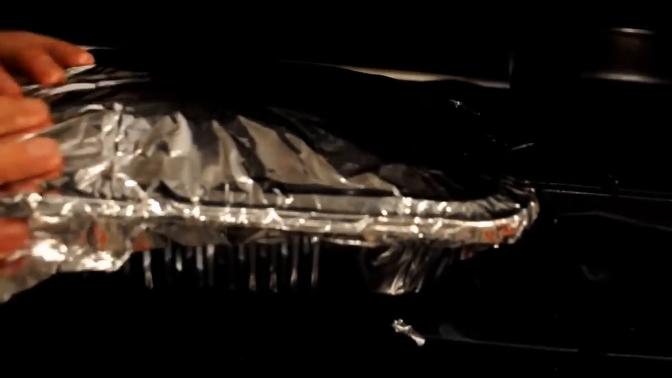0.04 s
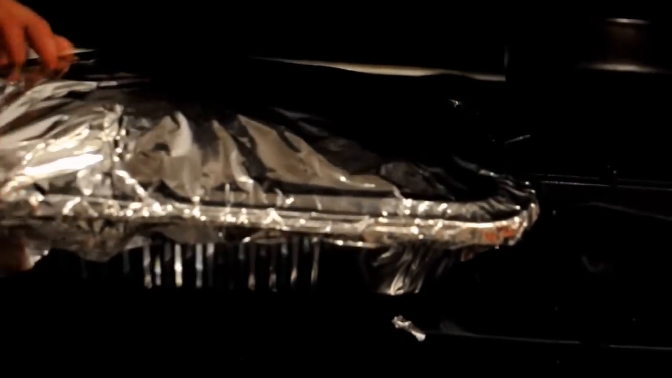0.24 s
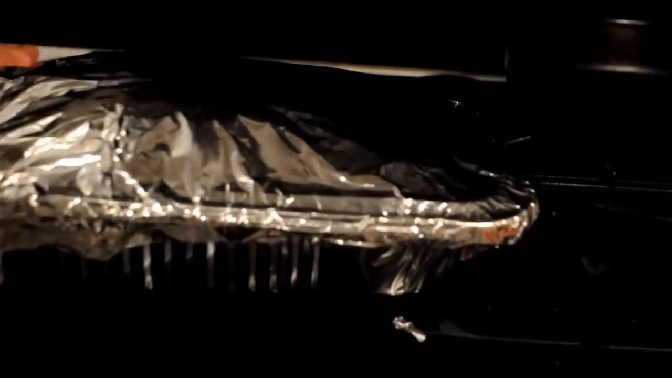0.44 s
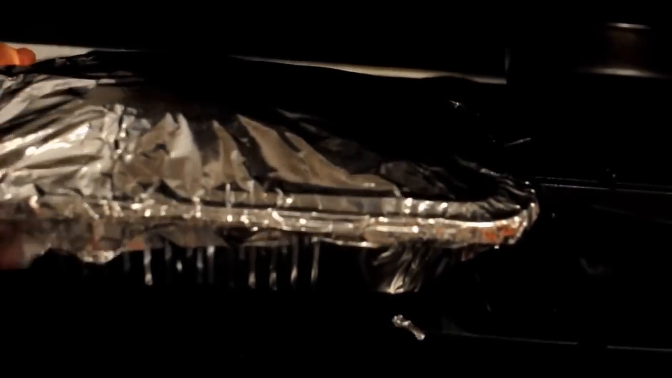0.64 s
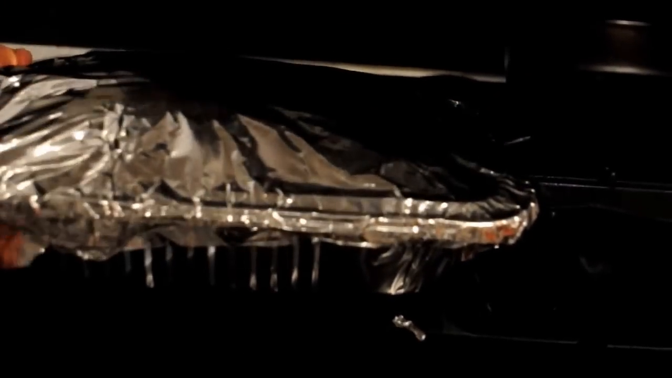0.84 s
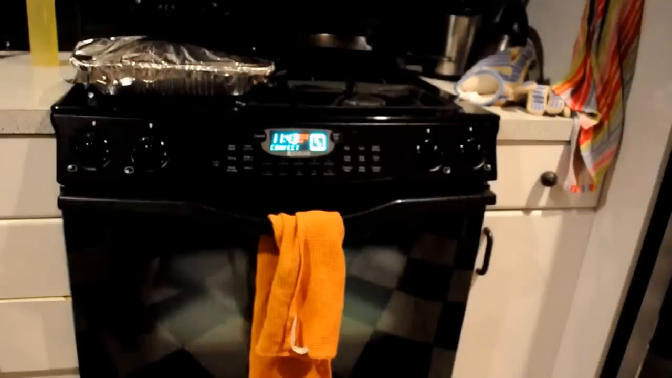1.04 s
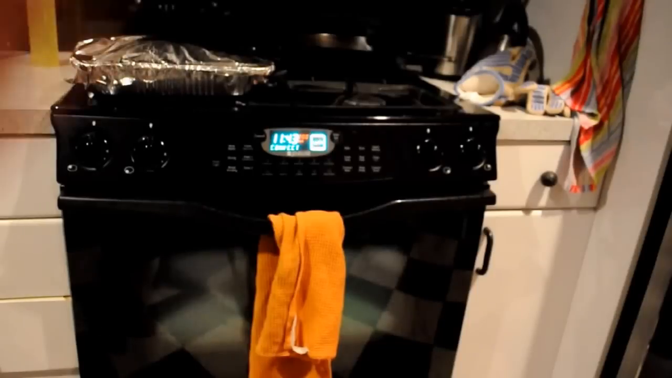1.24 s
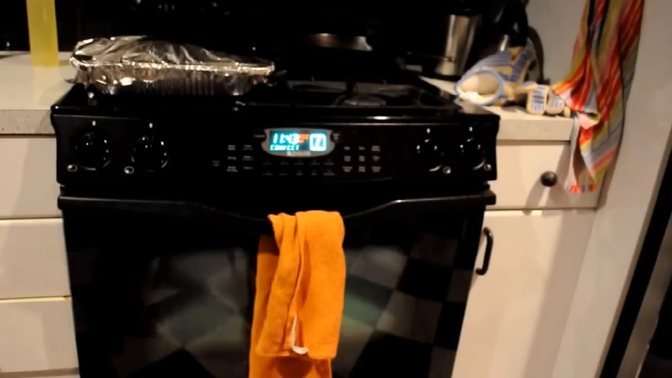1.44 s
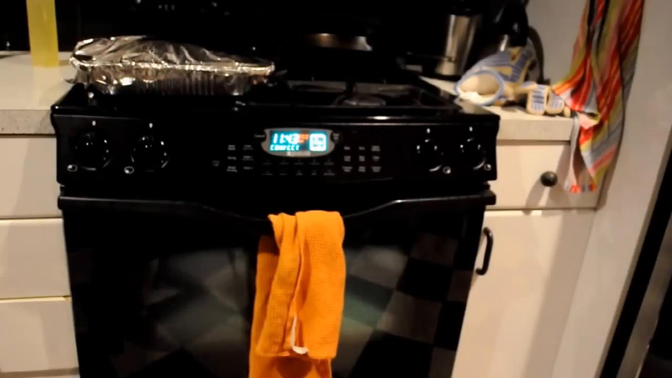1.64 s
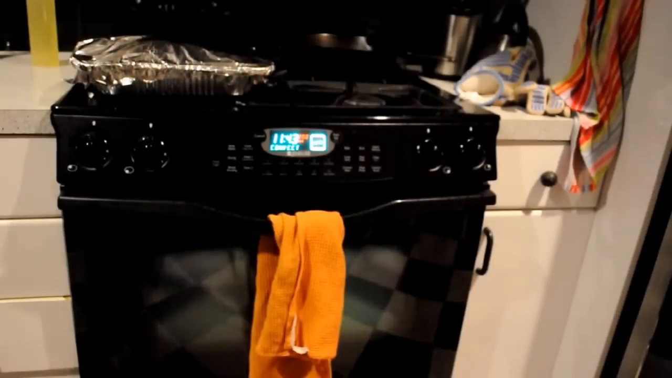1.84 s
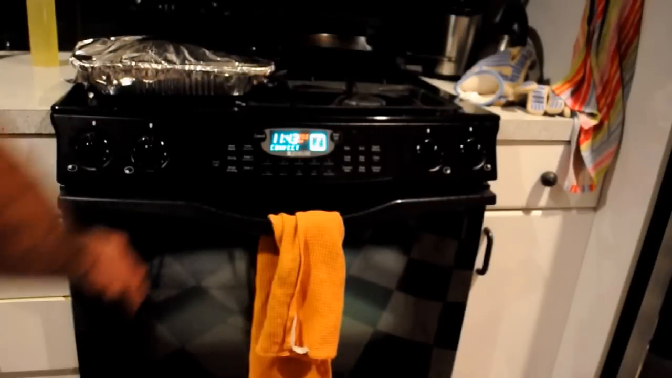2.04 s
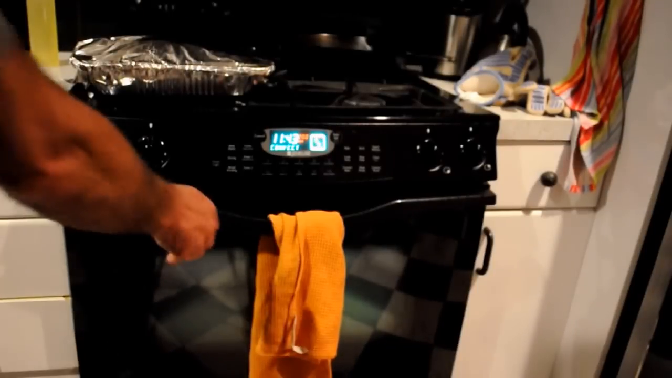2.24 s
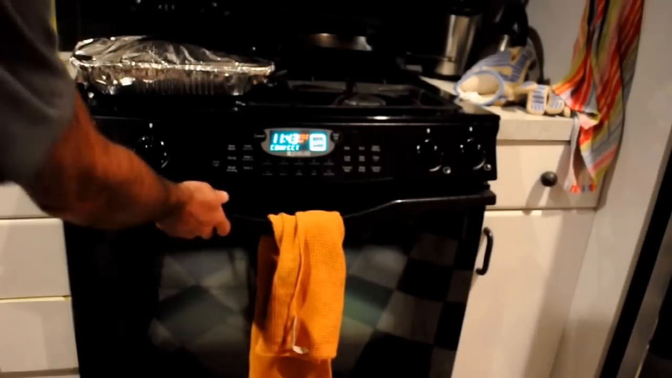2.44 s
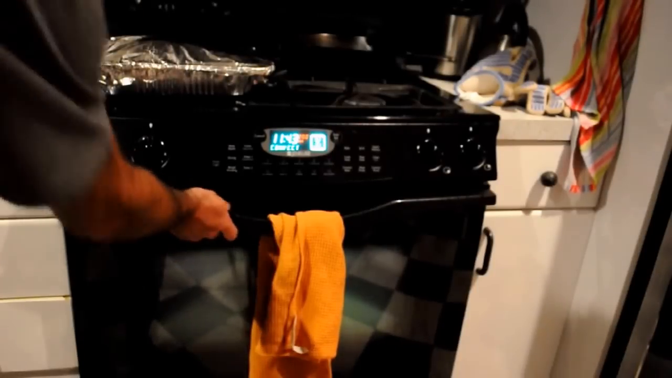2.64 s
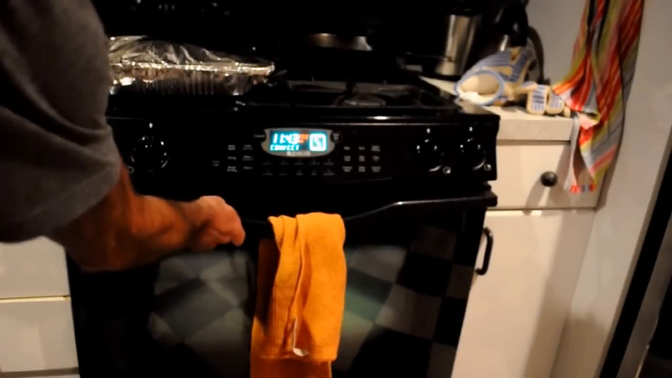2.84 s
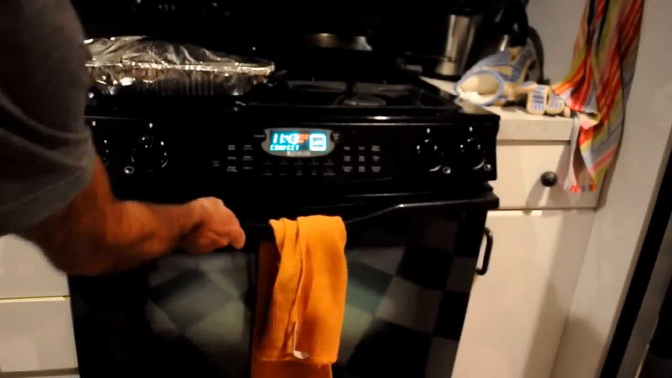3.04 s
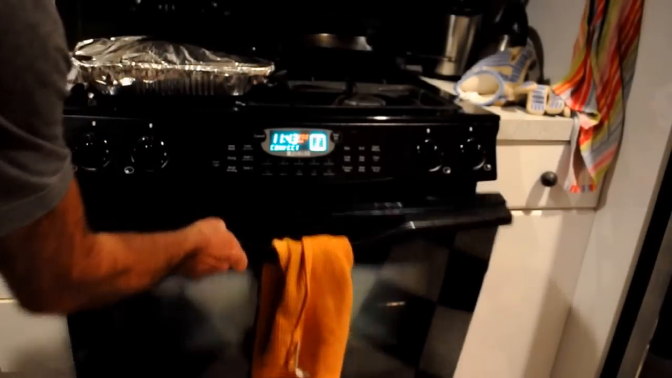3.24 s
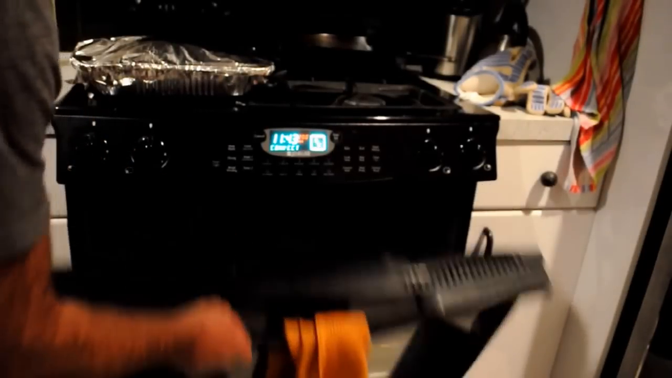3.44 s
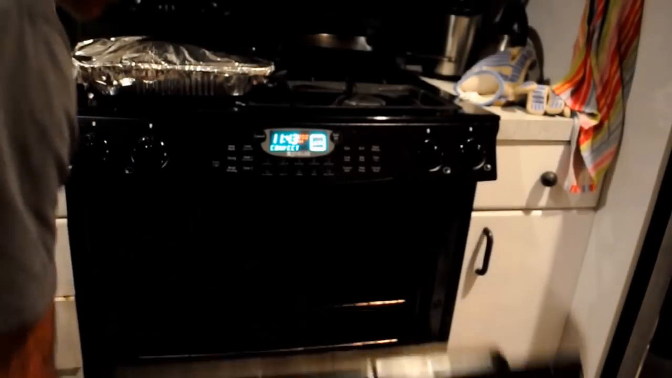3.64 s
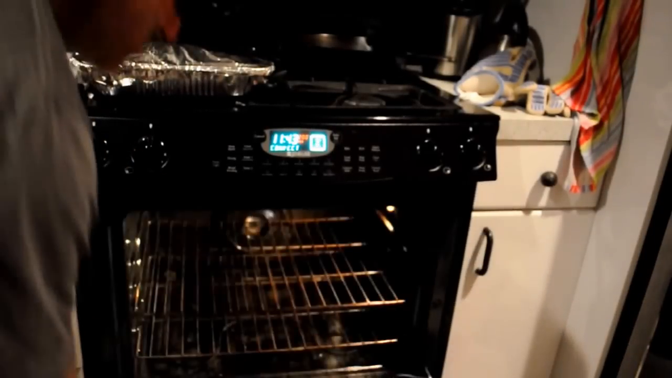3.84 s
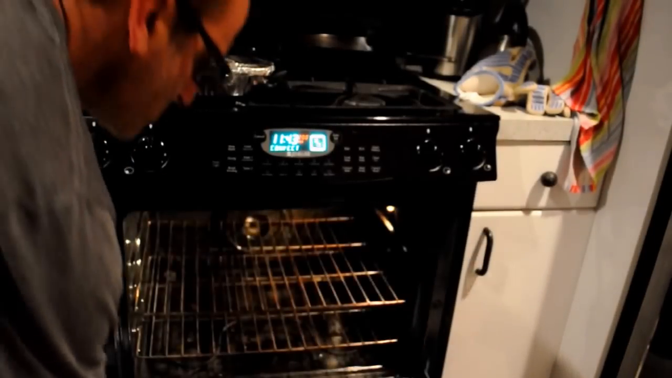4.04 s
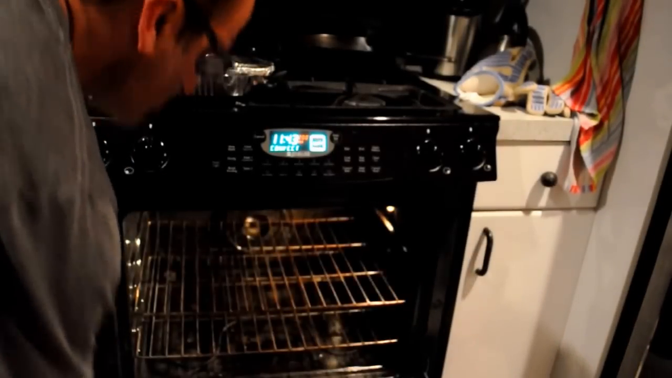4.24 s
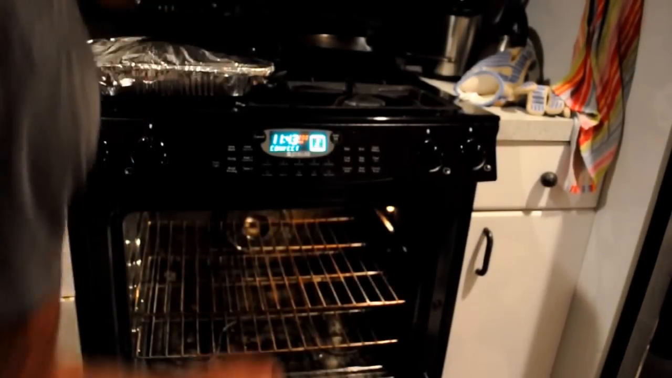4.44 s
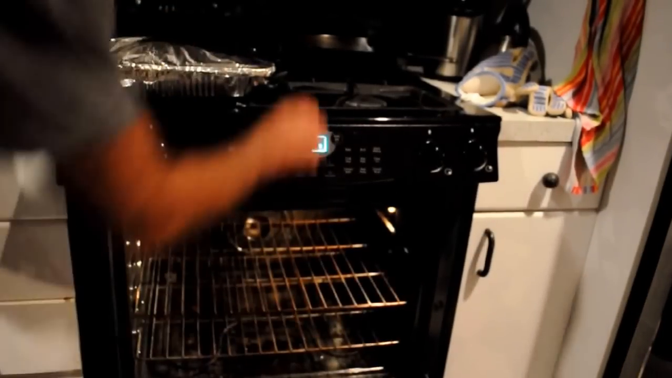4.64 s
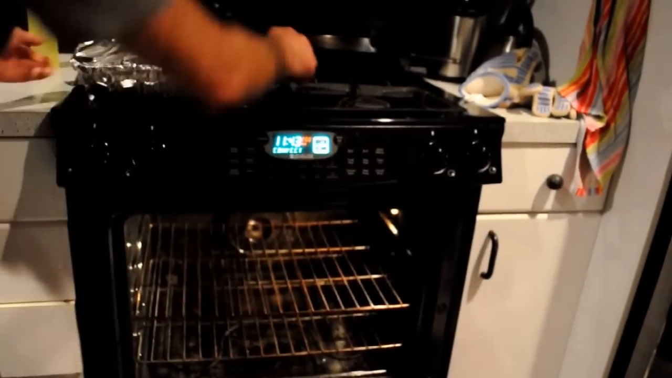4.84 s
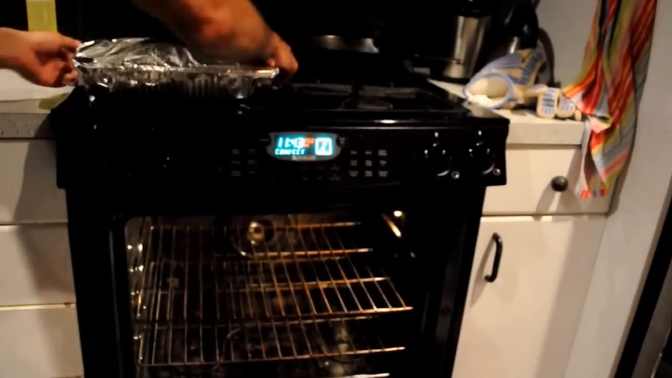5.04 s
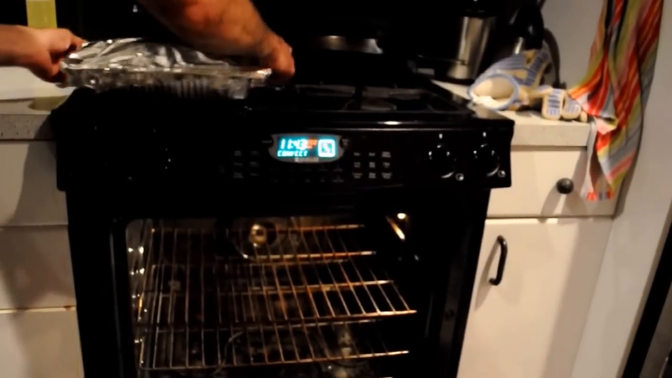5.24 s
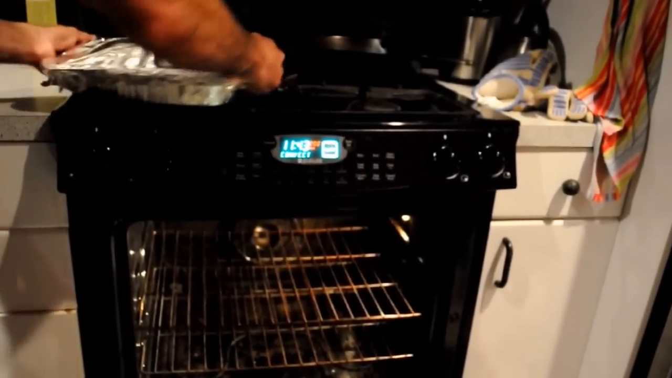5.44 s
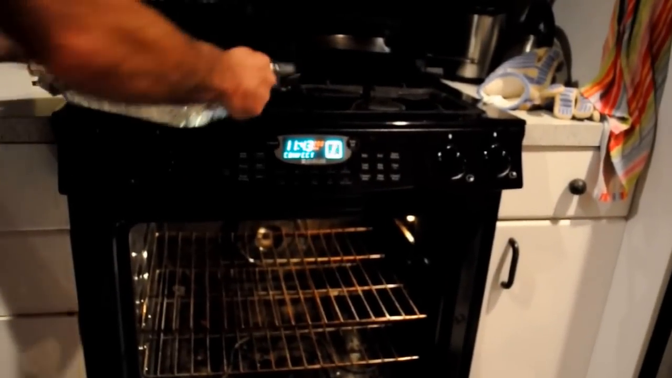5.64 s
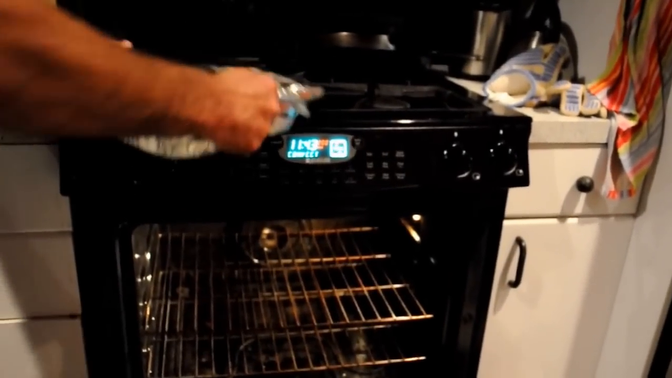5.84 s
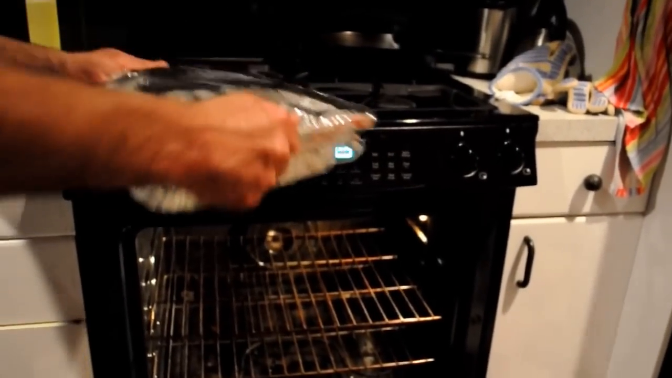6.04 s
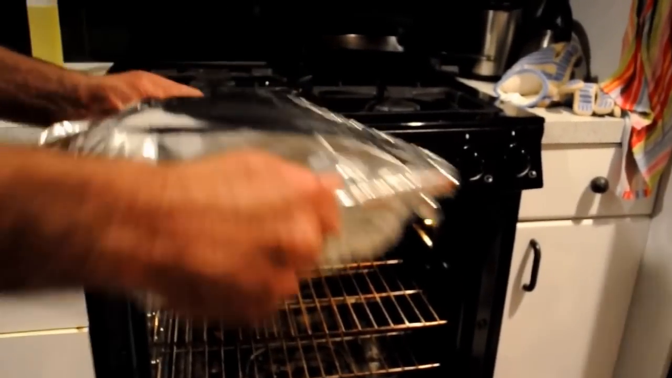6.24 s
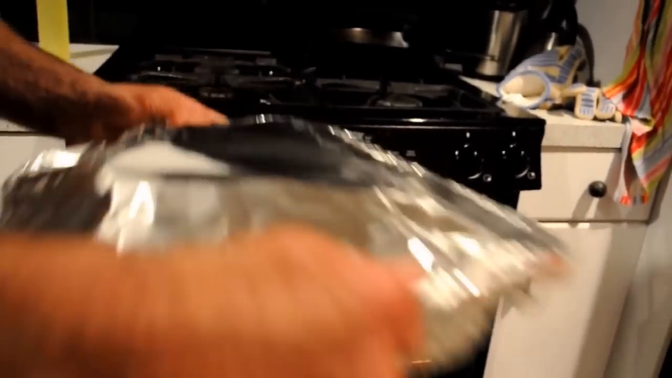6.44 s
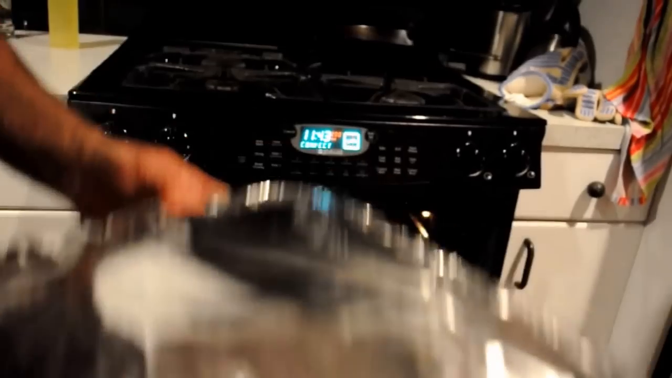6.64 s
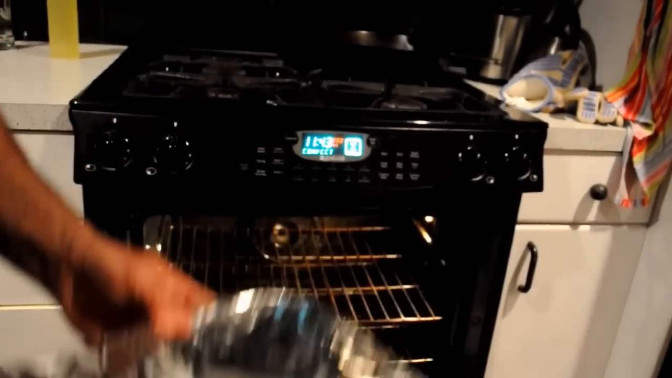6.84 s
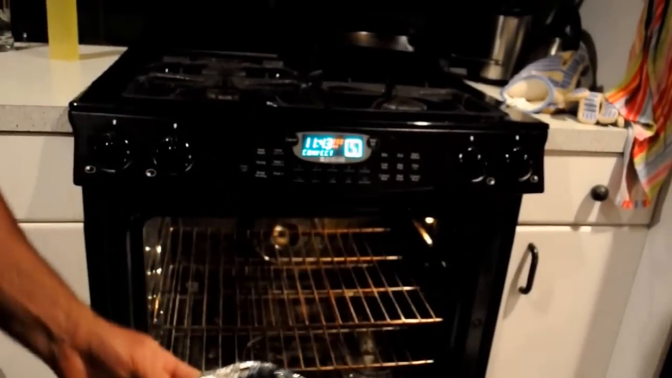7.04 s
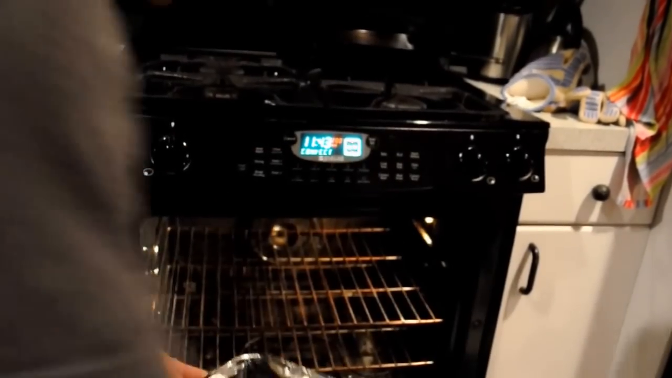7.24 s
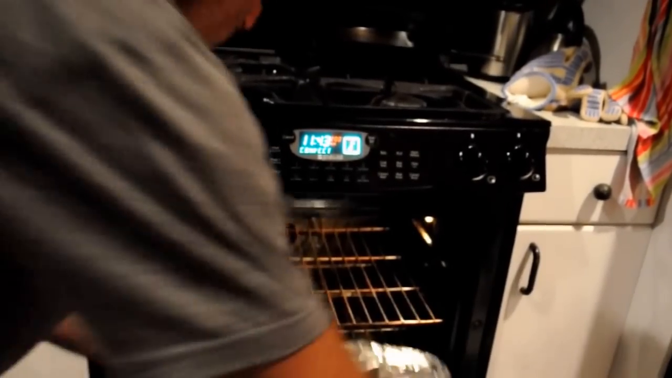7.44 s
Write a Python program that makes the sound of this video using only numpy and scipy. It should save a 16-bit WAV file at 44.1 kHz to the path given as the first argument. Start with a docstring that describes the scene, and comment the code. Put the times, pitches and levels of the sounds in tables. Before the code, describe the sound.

In a humming kitchen, sped-up foil crunching cuts to a creaking oven door dropping with a clattering bang, then pan knocks and crinkling foil.

```python
"""Foil and oven door in a small kitchen

Hands tuck aluminium foil round a pan, close by and at double speed; then, at normal speed, an oven door is
pulled open, drops to its stop and rattles, and the foil-covered pan is lifted off the stove and carried.
Foil is random buckling, struck objects are damped modes, the door is stick-slip through panel resonances;
appliance fans and motors hum in a small hard room, heard through a camera microphone with a narrow band."""
import sys
import numpy as np
from scipy import signal
from scipy.fft import rfft, irfft, next_fast_len
from scipy.io import wavfile
from scipy.ndimage import uniform_filter1d

SR = 44100
rng = np.random.default_rng(int(sys.argv[2]) if len(sys.argv) > 2 else 0)


def master_out(mix):
    """Clip the mix to full scale and print it as 16-bit PCM to the path in sys.argv[1]."""
    frames = np.transpose(np.atleast_2d(mix))
    ceiling = np.clip(frames, -1, 1)
    pcm = np.round(ceiling * 32767).astype(np.int16)
    wavfile.write(sys.argv[1], SR, pcm)


N = 330750

CLOSE_END_S = 1.062  # the fast close scene ends here, as played
FAST = 2  # playing speed of the close scene
CLOSE_N = round(CLOSE_END_S * SR)
LONG = N + (FAST - 1) * CLOSE_N  # samples in kitchen time, before the close scene is sped up

# All times below are as played; durations and pitches are in kitchen time unless marked as heard.
# Levels are those of the sources, before the room and the microphone.

# Appliance fans, noise spectrum: (frequency [Hz], density [dB per Hz])
FAN_SPECTRUM = [(15, -68.5), (25, -48.5), (112, -10.5), (178, -8), (285, -2), (417, -9.5), (466, -3.5),
                (521, -13.5), (570, -8), (652, -13), (852, -12.5), (1190, -16.5), (1270, -17), (1820, -24),
                (5200, -30), (6760, -79.5), (11400, -120)]
# Appliance fans, level: (close scene [dB], wide scene [dB])
FAN_LEVEL = (-41, -40)
# Hollows that the fans blow over: (frequency [Hz], width [Hz], level [dB])
FAN_HOLLOWS = [(275.2, 70, -3), (823, 14, -2), (1110.4, 17.15, -3.5)]
# Motor tones: (frequency [Hz], level in close scene [dB], level in wide scene [dB], waver [dB])
MOTOR_TONES = [(56.4, -70, -73.5, -1.5), (120.2, -46.5, -51.5, -2.1), (242, -48.5, -58, 1),
               (467, -47, -54, 3), (570, -61, -56, 3)]
# Foil being worked, one curve for the tucking and one for the carrying: (time [s], level [dB])
RUSTLE_CURVES = [
    [(0.0, -27.5), (0.33, -28.5), (0.365, -38.5), (0.39, -27.5), (0.6, -30.5), (0.71, -30), (0.78, -44.5),
     (0.86, -39), (0.92, -36), (1.016, -48), (1.06, -48)],
    [(4.966, -61), (4.974, -47), (5.02, -31), (5.07, -35.5), (5.12, -34.5), (5.14, -36), (5.168, -37),
     (5.22, -32), (5.3, -32), (5.42, -35.5), (5.51, -37), (5.7, -37), (5.78, -41), (5.876, -41.5),
     (6.04, -47), (6.08, -37), (6.3, -49.5), (6.48, -48), (6.69, -31), (6.86, -46.5), (7.3, -44),
     (7.46, -37), (7.5, -48)],
]
# Bursts of creases giving way together: (time [s], peak level [dB], bass share [dB], t60 [s])
FOIL_BURSTS = [(0.021, -11.5, -10.5, 0.53), (0.0643, -13, -7, 0.18), (0.085, -5, 3, 0.052),
               (0.104, -13, -5, 0.07), (0.112, -10, -1, 0.12), (0.128, -13, 0, 0.05),
               (0.138, -15, 3.5, 0.044), (0.1646, -17, 9, 0.25), (0.276, -14, 4, 0.071),
               (0.314, -14, -6, 0.069), (0.4127, -13.5, 2, 0.24), (0.4688, -13, -7.5, 0.11),
               (0.56, -23, -11, 0.092), (0.576, -7.5, -23, 0.029), (0.6, -20, -4, 0.045),
               (0.623, -13.5, -4, 0.092), (0.6427, -12, 2, 0.05), (0.652, -20, 4.5, 0.035),
               (0.68, -11, -5, 0.07), (0.7, -18.5, 4.5, 0.06), (0.716, -6, -2, 0.032),
               (0.74, -23, -3, 0.087), (0.821, -16, 7.5, 0.055), (0.8735, -23, -11, 0.078),
               (0.9, -22, 3, 0.15), (0.9077, -18.5, 8, 0.2), (0.928, -17.5, 3, 0.2), (0.949, -7, 8, 0.035),
               (1.054, -25, 12, 0.045), (5.013, -23, 3, 0.28), (5.5252, -21, 7.5, 0.31),
               (5.5776, -13, -12, 0.029), (5.6, -17, 2, 0.28), (5.6172, -16, 3.5, 0.11),
               (5.797, -19.5, -12, 0.22), (5.8254, -22, -21.5, 0.16), (5.909, -17.5, 4, 0.28),
               (5.959, -22, -17, 0.063), (6.0661, -18.5, 8.5, 0.067), (6.129, -14.5, 3, 0.065),
               (6.14, -14, 2, 0.18), (6.4021, -22, 5.5, 0.064), (6.484, -19.5, -19.5, 0.11),
               (6.537, -23.5, -23, 0.068), (6.576, -17, -17.5, 0.088), (6.6, -15, -19, 0.076),
               (6.6868, -10.5, 1.5, 0.047), (6.6917, -6.5, -3.5, 0.065), (6.776, -27, -15, 0.11),
               (6.85, -17, -14, 0.062), (7, -21, 3, 0.097), (7.0363, -19.5, 6, 0.032),
               (7.146, -23, -8, 0.11), (7.2192, -26, -3, 0.1), (7.31, -19.5, -22, 0.11),
               (7.3296, -15, -11, 0.39), (7.349, -23.5, -5.5, 0.12), (7.3758, -24, -6, 0.19)]
# Sound spectrum of the foil: (frequency [Hz], density [dB per Hz])
FOIL_SPECTRUM = [(180, -30), (300, -15.5), (424, -13), (456, -18.5), (558, -12), (607, -10.5), (900, -10),
                 (1150, -6.5), (1900, -4.5), (2800, -5), (3950, -1.5), (5200, 1), (6760, -36),
                 (11400, -120)]
# Pops of single large creases, and at 5.236 to 5.369 s sharp edges of the pan knocks:
# (time [s], peak level [dB], pitch as heard [Hz])
SHARP_POPS = [(0.0664, -18, 6300), (0.0914, -19, 4470), (0.104, -15, 9000), (0.112, -14, 8000),
              (0.132, -10, 10000), (0.1395, -15, 6000), (0.168, -17, 8500), (0.1748, -9, 7600),
              (0.183, -9, 7460), (0.239, -16, 3500), (0.255, -21, 5240), (0.2755, -12, 9800),
              (0.285, -17, 2930), (0.316, -12, 9800), (0.343, -17, 8000), (0.383, -15, 10000),
              (0.4155, -17, 9800), (0.445, -12, 10000), (0.4699, -13, 6600), (0.548, -24, 7300),
              (0.564, -9, 9000), (0.5757, -1.5, 8400), (0.601, -11.5, 2980), (0.644, -13, 7500),
              (0.651, -11.5, 3200), (0.681, -15, 9500), (0.6869, -7.5, 9000), (0.702, -18, 5500),
              (0.707, -20, 2700), (0.715, -1, 2650), (0.718, -9.5, 8050), (0.739, -14, 5000),
              (0.7464, -13.5, 3460), (0.762, -18, 7000), (0.8212, -18, 5470), (0.8945, -25, 9800),
              (0.9089, -15, 3000), (0.944, -25, 7500), (0.9492, -11.5, 7920), (1.054, -33.5, 9000),
              (5.236, -6.5, 2134), (5.2394, -6, 4830), (5.266, -17.5, 2600), (5.3543, -8.5, 3800),
              (5.3556, -6, 2770), (5.369, -10, 1390), (5.5793, -24, 4420), (5.625, -16, 4600),
              (5.909, -13, 4281), (6.0652, -17, 2720), (6.12, -23, 4780), (6.1324, -16, 4480),
              (6.141, -13.5, 4330), (6.401, -19.5, 3270), (6.483, -21.5, 4380), (6.577, -14, 2890),
              (6.6004, -21.5, 3800), (6.354, -33.5, 1950), (6.545, -24.5, 1820), (6.666, -30, 1500),
              (6.6941, -7.5, 4970), (6.697, -5, 4200), (6.708, -20.5, 4600), (6.783, -20, 4680),
              (6.8516, -14.5, 4700), (7.001, -23, 4520), (7.0372, -18.5, 2500), (7.113, -34, 3000),
              (7.15, -31.5, 4320), (7.219, -20.5, 3400), (7.3117, -15, 4060), (7.3303, -15, 3890),
              (7.346, -12, 3800), (7.374, -16, 4500), (7.409, -25, 3900)]
# Reverberation of the room: (frequency [Hz], t60 [s])
ROOM_DECAY = [(250, 0.76), (700, 0.32), (1800, 0.51), (4600, 0.28)]
# Soft low bumps of hand, handle, counter and door: (time [s], level [dB], pitch [Hz])
SOFT_BUMPS = [(1.005, -23, 271), (1.21, -25.5, 286), (2.536, -24, 364), (2.676, -23.5, 139),
              (3.17, -26.5, 268), (3.285, -28, 326), (3.437, -23.5, 269), (3.456, -25, 530)]
# Clothes brush as someone steps up to the oven: (time [s], hold [s], level [dB])
CLOTH_BRUSHES = [(1.38, .1, -57.5), (1.6, 0.29, -50.5), (2.215, .02, -48.5), (2.366, 0.011, -42.5),
                 (2.535, .04, -56)]
# Racks and hinge springs tick: (time [s], peak level [dB])
RACK_TICKS = [(2.539, -34), (2.656, -26), (2.733, -26), (2.7631, -24), (2.961, -26), (3.645, -23.5),
              (3.7061, -28.5), (3.7529, -25.5), (3.796, -24), (3.8706, -25), (3.952, -23), (3.9939, -24),
              (4.0369, -24), (4.0746, -27.5), (4.12, -29.5), (4.161, -35), (4.207, -33), (4.2381, -21.5),
              (4.329, -28), (4.372, -26)]
# Modes of the racks: (frequency [Hz], level [dB], t60 [s], capped at longest_s)
RACK_MODES = [(1670, 4.5, 5.0), (1940, -21.5, 5.0), (2700, 1.5, 1.3), (2680, 4, 0.17), (2700, -5, 0.26),
              (3170, 3.5, 0.44), (3760, -19, 0.11), (4270, -9, 0.1), (4320, -7.5, 0.38), (4500, 1.5, 0.27),
              (4760, -15.5, 0.3)]
# Door drags on gasket and hinge, one row a jerk:
# (time [s], hold [s], groan level [dB], hiss relative to groan [dB], groan fall [dB/s])
DRAG_JERKS = [(2.65, 0.0082, -43.5, 8, 100.5), (2.745, .03, -40, -6.5, 102.5), (2.78, 0.036, -25, -2, 92),
              (2.956, 0.14, -26.5, -4.5, 103), (3.011, 0.038, -23, -14, 92.5),
              (3.09, 0.026, -33, -7.5, 103), (3.134, 0.042, -31, -14, 262),
              (3.174, 0.013, -34, -18.5, 303.5), (3.215, 0.067, -36.5, -10, 106)]
# Resonances of the dragged door panel: (frequency [Hz], width [Hz], level [dB])
PANEL_RESONANCES = [(166, 38, 0.5), (295, 50, -4), (359, 34, -8), (377, 50, 8), (414, 25, 4.5),
                    (535, 35, -4.5), (646, 64, -8.5), (653, 22, -10), (755, 41, 5.5), (882, 28, 6),
                    (970, 31, -6), (1177, 61, -7.5), (1340, 43, -19.5), (1384, 28, -5.5), (1580, 39, 3),
                    (1683, 67, 5)]
# Notes that sing out of the drag: (time [s], hold [s], level [dB], start pitch [Hz], end pitch [Hz])
CREAK_NOTES = [(2.776, 0.022, -31.5, 1125, 1140), (2.783, 0.029, -37.5, 400, 474),
               (2.8, .04, -43, 870, 878), (2.81, 0.019, -36.5, 1580, 1580), (2.961, 0.034, -33, 370, 362),
               (2.967, 0.029, -34.5, 1134, 1130), (3.013, 0.037, -30.5, 655, 587),
               (3.022, 0.082, -29.5, 890, 883), (3.048, 0.016, -31, 371, 357),
               (3.062, .05, -37, 1100, 1137), (3.112, 0.068, -32.5, 767, 817),
               (3.132, 0.049, -31, 498, 540), (3.134, 0.03, -33, 1143, 1153),
               (3.148, 0.029, -38, 1320, 1273), (3.148, 0.02, -46.5, 1640, 1605),
               (3.157, 0.031, -31, 272.3, 271)]
# The door lands on its stop and bounces: (time [s], peak level [dB])
DOOR_BANGS = [(3.435, -6), (3.439, -7), (3.444, -10.5), (3.451, -10.5), (3.455, -9.5), (3.465, -13.5),
              (3.471, -15.5), (3.496, -19), (3.539, -16.5), (3.6, -22.5)]
# Modes of the struck door: (frequency [Hz], level [dB], t60 [s], capped at longest_s)
DOOR_MODES = [(254, -3.5, 0.2), (550, 7.5, 0.078), (370, -2, 0.15), (687, -0.5, 0.12), (905, -1, 0.15),
              (1055, 2.5, 0.069), (1130, -10, 0.096), (1300, -25.5, 0.92), (1574, 2, 0.06), (1720, 0, 0.3),
              (1840, 2, 0.095), (2090, -13, 0.097), (2480, -17.5, 0.44), (2896, -26.5, 5.0),
              (3540, -17, 0.11), (3950, -27, 0.1), (4480, -19, 0.14), (4500, -16, 0.46), (4850, -12, 0.94),
              (4960, 0, 1.6)]
# The racks shiver after the bang, one row: (start [s], end of slow sag [s], level [dB])
RACK_SHIVER = (3.45, 4.3, -44)
# The pan knocks on the iron grate: (time [s], peak level [dB])
PAN_KNOCKS = [(5.2289, -15), (5.233, -6.5), (5.354, -4.5), (5.368, -15.5)]
# Modes of the pan: (frequency [Hz], level [dB], t60 [s], capped at longest_s)
PAN_MODES = [(976, -6, 0.21), (1150, -8, 0.18), (1363, -1.5, 0.34), (1627, -2.5, 0.09), (2120, -22, 5.0),
             (2450, -18, 0.026), (2600, -4.5, 0.21), (3340, -19.5, 5.0), (3270, -19.5, 0.33),
             (3200, -14, 0.22), (3800, -4.5, 0.19), (4100, -2.5, 0.22), (4350, -2.5, 0.05),
             (4380, -14.5, 0.17), (4870, -2.5, 0.64), (5300, -18, 0.11)]

SWELL_SHARE = 0.15  # time constant of a burst's swell as a share of its t60: long ones start softly
FACET_LOW_HZ, FACET_HIGH_HZ, FACET_WIDTH_HZ, FACET_DB = 2300, 5200, 190, 0.5  # flat facets ring in a burst
POP_Q, POP_NOTE_DB = 5.5, 10.5  # sharpness and strength of a pop's note
BRUSH_RISE_S, BRUSH_FALL_DB_PER_S = 0.0047, 106
JERK_RISE_S, HISS_FALL_DB_PER_S = 0.0046, 154
CREAK_RISE_S, CREAK_FALL_DB_PER_S, CREAK_PITCH_WAVER = 0.0036, 453, 0.01246  # waver: rms share of pitch
SHIVER_SAG_DB_PER_S, SHIVER_STOP_DB_PER_S = 16.5, 110  # the shiver sags slowly, then stops
CAMERA_HZ, EDGE_HZ = 5480, 11558  # band edge of the camera; final band limit


def amp(db):
    """Level law: the amplitude gain of a level in dB."""
    return np.exp(np.asarray(db) * (np.log(10) / 20))


def evened(x):
    """Normalisation of power: the signal scaled to rms 1."""
    return x / np.sqrt(np.mean(x ** 2) + 1e-20)


def lived(s):
    """Time scaling: the sample in kitchen time of a moment in played time."""
    s = np.asarray(s)
    return (s + (FAST - 1) * np.minimum(s, CLOSE_END_S)) * SR


def curve(rows):
    """Linear interpolation of level over kitchen time, silent outside its span."""
    rows = np.asarray(rows)
    return np.interp(np.arange(LONG), lived(rows[:, 0]), rows[:, 1], left=-120, right=-120)


def stroke(s, hold_s, db, rise_s, fall_db_per_s):
    """Exponential decay of one gesture: quick rise, hold, then a steady fall in dB."""
    t = (np.arange(LONG) - lived(s)) / SR
    rise = np.clip(t / rise_s, 0, 1)
    return rise * amp(db - fall_db_per_s * np.maximum(t - rise_s - hold_s, 0))


def read(points, hz):
    """Interpolation of a spectrum along a logarithmic frequency axis."""
    f, value = np.transpose(points)
    return np.interp(np.log(hz + 1), np.log(f + 1), value)


def coloured(x, points):
    """Linear filtering: x weighted by a spectrum in the frequency domain."""
    size = next_fast_len(len(x))
    gain = amp(read(points, np.fft.rfftfreq(size, 1 / SR)))
    return irfft(rfft(x, size) * gain, size)[:len(x)]


def resonate(x, hz, width_hz):
    """Simple resonance: two poles, gain 1 at the peak."""
    return signal.lfilter(*signal.iirpeak(hz, hz / width_hz, SR), x)


def filtered(x, order, hz, kind="low"):
    """Butterworth filtering: a band kept with a smooth passband."""
    return signal.sosfilt(signal.butter(order, hz, kind, fs=SR, output="sos"), x)


def wander(hz):
    """Low-passed chance: a slow random course of about rms 1, limited to 2 either way."""
    steps = rng.standard_normal(LONG // 256 + 401)
    smooth = signal.lfilter(*signal.butter(2, hz, fs=SR / 256), steps)[400:]  # without the filter's start
    return np.interp(np.arange(LONG) / 256, np.arange(len(smooth)), np.clip(evened(smooth), -2, 2))


def clicks(per_s, spread_db):
    """Random impulse train: most clicks are small and a few large."""
    out, count = np.zeros(LONG), int(per_s * LONG / SR)
    size = amp(spread_db * np.minimum(rng.exponential(1, count), 3.5))
    out[rng.integers(0, LONG, count)] = size * rng.choice([-1., 1.], count)
    return out


def add(mix, s, sound):
    """Superposition: a sound is summed into the mix at played time s."""
    part = mix[int(lived(s)):][:len(sound)]
    part += sound[:len(part)]


def ring(modes, crack_db, crack_s, clatter_db, clatter_s, spread, longest_s, low_hz, top_hz):
    """Modal response to a blow: detuned damped modes, a crack, and noise for the clatter of many close modes."""
    t = np.arange(SR // 3) / SR
    hz, db, t60 = np.transpose(modes)[:, :, None]
    detune, phase, struck = rng.random((3, len(modes), 1))
    dying = amp(db + 4.5 * struck - 60 * t / np.minimum(t60, longest_s))  # no mode rings longer than longest_s
    tones = dying * np.sin(2 * np.pi * (hz * (1 + spread * (detune - .5)) * t + phase))
    noise = filtered(rng.standard_normal(len(t)), 4, low_hz, "high")
    crack = noise * amp(crack_db - 60 * t / crack_s)
    clatter = filtered(noise, 1, top_hz) * amp(clatter_db - 60 * t / clatter_s)
    blow = tones.sum(0) + crack + clatter
    blow *= 1 - np.exp(-t / 0.00032)
    return blow / (3.5 * blow[:SR // 100].std())  # the first 10 ms peak at about 3.5 times their rms


def struck_series(rows, modes, **blow):
    """Repeated impact: each blow excites the same modes anew."""
    out = np.zeros(LONG)
    for s, db in rows:
        add(out, s, amp(db) * ring(modes, **blow))
    return out


def appliances():
    """Flow noise and rotation: fan noise, hollow resonances that come and go, and wavering motor tones."""
    air = evened(coloured(rng.standard_normal(LONG), FAN_SPECTRUM)) * amp(1.2 * wander(6.5))
    blow = rng.standard_normal(LONG)
    hollow = sum(amp(db + 3 * wander(7)) * resonate(blow, hz, width) for hz, width, db in FAN_HOLLOWS)
    close = np.arange(LONG) < FAST * CLOSE_N
    out = amp(np.where(close, *FAN_LEVEL)) * evened(air + .5 * evened(hollow))
    for hz, close_db, wide_db, waver_db in MOTOR_TONES:
        turns = np.cumsum(hz * (1 + 0.0028 * wander(2.7))) / SR
        level = amp(np.where(close, close_db, wide_db) + waver_db * wander(2.6))
        out += np.sqrt(2) * level * np.sin(2 * np.pi * turns)
    return out


def foil_rustle():
    """Buckling as shot noise: countless tiny creases give way in clumps, each patch with its own short ring."""
    t = np.arange(400) / SR
    grains = np.zeros(LONG)
    for hz in np.geomspace(500, 5600, num=12):
        impact = rng.standard_normal(len(t)) * amp(-60 * t / 0.018)
        tick = evened(resonate(impact, hz, .35 * hz)) * (hz / 2000) ** 0.23
        grains += signal.oaconvolve(clicks(170, 2.7), tick)[:LONG] * amp(0.96 * wander(25))
    crackle = evened(coloured(grains, FOIL_SPECTRUM) * amp(2.2 * wander(40)))
    return sum(amp(curve(rows)) for rows in RUSTLE_CURVES) * crackle


def foil_bursts():
    """Collective buckling: dense gritty creases swell and die together and ring flat facets of the sheet."""
    out, t = np.zeros(LONG), np.arange(SR // 4) / SR
    for s, db, bass_db, t60 in FOIL_BURSTS:
        t60 = max(t60, .01)
        noise = rng.standard_normal(len(t))
        roughness = 2.2 if s < CLOSE_END_S else 1.2  # rougher from near
        grit = amp(roughness * evened(uniform_filter1d(noise[::-1], size=120)))  # many separate creases
        ticks = roughness * noise * (abs(noise) > 2.8)  # some creases stand out
        sheet = evened(coloured((noise + ticks) * grit, FOIL_SPECTRUM))
        bass = signal.lfilter(*signal.butter(2, 2200, fs=SR), sheet)  # large creases sound lower
        sheet = sheet - bass + amp(bass_db) * bass
        facets = sum(resonate(sheet, hz, FACET_WIDTH_HZ) for hz in rng.uniform(FACET_LOW_HZ, FACET_HIGH_HZ, 4))
        sheet = evened(sheet + amp(FACET_DB) * facets)
        swell = (1 - np.exp(-t / (SWELL_SHARE * t60))) * amp(-60 * t / t60)
        add(out, s, amp(db) * sheet / 4 * swell / swell.max())  # noise peaks at about 4 times its rms
    return out


def sharp_pops():
    """Impulse excitation of one resonance: a large crease, or the edge of a pan knock, pops with its own note."""
    out, t = np.zeros(LONG), np.arange(600) / SR
    for s, db, heard_hz in SHARP_POPS:
        impact = (3 * (t == 0) + rng.standard_normal(len(t))) * amp(-60 * t / 0.011)
        pop = filtered(impact, 2, [1300, 6500], "band")
        hz = heard_hz / (FAST if s < CLOSE_END_S else 1)
        pop = pop + amp(POP_NOTE_DB) * resonate(pop, hz, hz / POP_Q)
        add(out, s, amp(db) * pop / abs(pop).max())
    return out


def kitchen(x):
    """Reverberation: sparse reflections of random sign after 5 ms, each band dying at its own speed."""
    taps = np.zeros(SR // 2)
    at = np.arange(220, len(taps) - 20, 20)
    taps[at + rng.integers(0, 20, len(at))] = rng.choice([-1., 1.], len(at))
    hz, t, z = signal.stft(taps, SR, nperseg=256)
    decay = amp(-60 * t / read(ROOM_DECAY, hz)[:, None])
    tail = signal.istft(z * decay, SR, nperseg=256)[1]
    return signal.oaconvolve(x, tail / np.linalg.norm(tail))[:len(x)]


def bumps():
    """Soft contact: a slow onset excites one low, quickly damped tone."""
    out, t = np.zeros(LONG), np.arange(SR // 8) / SR
    for s, db, hz in SOFT_BUMPS:
        envelope = amp(db - 60 * t / 0.088) * (1 - np.exp(-t / 0.0065))
        add(out, s, envelope * np.sin(2 * np.pi * hz * t))
    return out


def cloth():
    """Fibre friction: slightly grainy high noise, shaped into soft brushes."""
    brush = rng.standard_normal(LONG) * amp(3.9 * wander(30))
    level = sum(stroke(*row, BRUSH_RISE_S, BRUSH_FALL_DB_PER_S) for row in CLOTH_BRUSHES)
    return level * evened(filtered(brush, 2, [2000, 6500], "band"))


def rack_ticks():
    """Impact on thin metal: light blows ring the modes of the racks."""
    return struck_series(RACK_TICKS, RACK_MODES, crack_db=11.0, crack_s=0.0022, clatter_db=19.0, clatter_s=0.36,
                         spread=0.09, longest_s=0.17, low_hz=470, top_hz=3200)


def door_drag():
    """Stick-slip friction: dense uneven slips of gasket and hinge drive the door panel; a hiss rides on top."""
    slips = clicks(2500, 1.6) * amp(1.2 * wander(40))
    groan = sum(amp(db + 3 * wander(9)) * resonate(slips, hz, width) for hz, width, db in PANEL_RESONANCES)
    body = filtered(slips, 6, [170, 1780], "band")
    hiss = evened(filtered(slips, 2, 1900, "high"))
    panel = evened(evened(groan) + .95 * evened(body))
    pull = np.max([stroke(s, hold, db, JERK_RISE_S, fall) for s, hold, db, _, fall in DRAG_JERKS], axis=0)
    scrape = np.max([stroke(s, hold / 2, db + hiss_db, JERK_RISE_S, HISS_FALL_DB_PER_S)
                     for s, hold, db, hiss_db, _ in DRAG_JERKS], axis=0)
    return pull * panel + scrape * hiss


def creaks():
    """Tonal friction: short sine notes slide in pitch, with an unsteady frequency."""
    out, shake = np.zeros(LONG), wander(41.7)
    for s, hold, db, start_hz, end_hz in CREAK_NOTES:
        glide = np.interp(np.arange(LONG), lived([s, s + hold]), [start_hz, end_hz])
        hz = glide * (1 + CREAK_PITCH_WAVER * shake)
        note = np.sqrt(2) * np.sin(2 * np.pi * (np.cumsum(hz) / SR + rng.random()))
        shake = np.roll(shake, SR)  # each note wavers differently
        out += stroke(s, hold, db, CREAK_RISE_S, CREAK_FALL_DB_PER_S) * note
    return out


def door_bangs():
    """Impact and rebound: the landing and its bounces ring the modes of the door."""
    return struck_series(DOOR_BANGS, DOOR_MODES, crack_db=19.2, crack_s=0.039, clatter_db=13.6, clatter_s=0.7,
                         spread=0.022, longest_s=0.14, low_hz=224, top_hz=930)


def rack_shiver():
    """Chatter of loose contacts: wires hit their rails at random and excite the rack resonances."""
    chatter = clicks(900, 2.8) * amp(4 * wander(13))
    wires = sum(amp(db + 5 * wander(6.5)) * resonate(chatter, hz, 300) for hz, db, _ in RACK_MODES)
    loose = filtered(chatter, 1, [700, 6000], "band")
    start, end, db = RACK_SHIVER
    sag = stroke(start, 0, db, .01, SHIVER_SAG_DB_PER_S)
    stop = stroke(start, end - start, 0, .01, SHIVER_STOP_DB_PER_S)
    return sag * stop * evened(evened(wires) + 1.3 * evened(loose))


def pan_knocks():
    """Impact of metal on iron: hard blows ring the damped modes of the pan."""
    return struck_series(PAN_KNOCKS, PAN_MODES, crack_db=18.8, crack_s=0.011, clatter_db=15.4, clatter_s=0.36,
                         spread=0.046, longest_s=0.16, low_hz=980, top_hz=2200)


def scene():
    """Superposition and time scaling: both scenes share a room; the close one is played fast, an octave up."""
    near = foil_rustle() + foil_bursts() + sharp_pops() + bumps() + cloth() + rack_ticks()
    near += door_drag() + creaks() + door_bangs() + rack_shiver() + pan_knocks()
    near = filtered(near, 2, 110, "high")  # the near sounds carry no deep bass
    close, wide = np.split(near, [FAST * CLOSE_N])
    hum_close, hum_wide = np.split(appliances(), [FAST * CLOSE_N])
    close = amp(0.5) * close + amp(-7) * kitchen(close) + hum_close
    wide = amp(-0.5) * wide + amp(-10.0) * kitchen(wide) + hum_wide
    return np.concatenate([signal.resample_poly(close, 1, FAST), wide])[None]


def record(dry):
    """Band limitation and overload: the camera's band, twice as wide in the fast scene, then slight distortion."""
    narrow = signal.firwin(255, CAMERA_HZ - 60, window=("kaiser", 7), fs=SR)
    doubled = FAST * narrow[None, 1::FAST]  # every second tap: the band edge an octave higher
    close = signal.oaconvolve(dry[:, :CLOSE_N], doubled, "same")
    wide = signal.oaconvolve(dry, narrow[None], "same")[:, CLOSE_N:]
    joined = np.concatenate([close, wide], axis=1)
    joined = joined + amp(-94.5) * rng.standard_normal(dry.shape)  # faint noise floor
    joined = joined - amp(-32.5) * joined ** 3  # the highest peaks distort very slightly
    final_band = signal.firwin(511, EDGE_HZ, window=("kaiser", 9), fs=SR)
    return signal.oaconvolve(joined, final_band[None], "same")


dry = scene()
out = record(dry)
master_out(out)
```